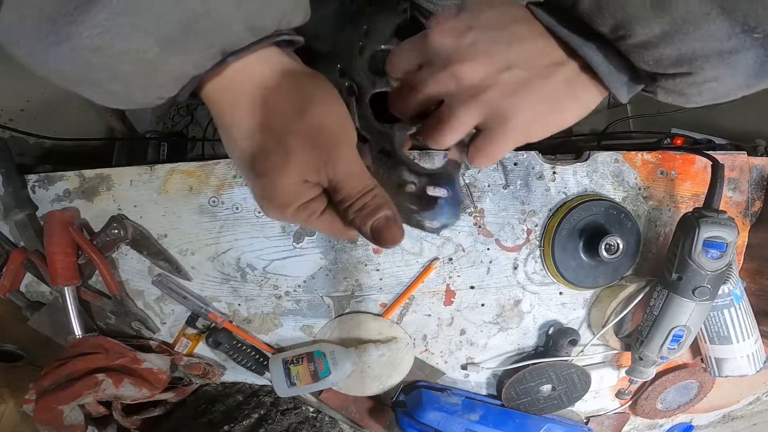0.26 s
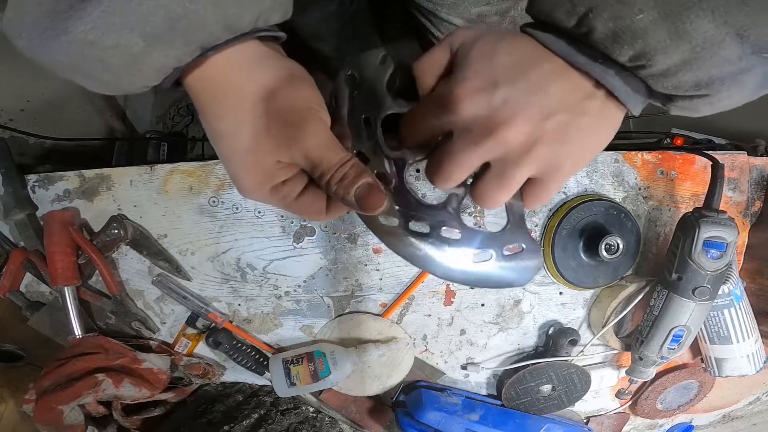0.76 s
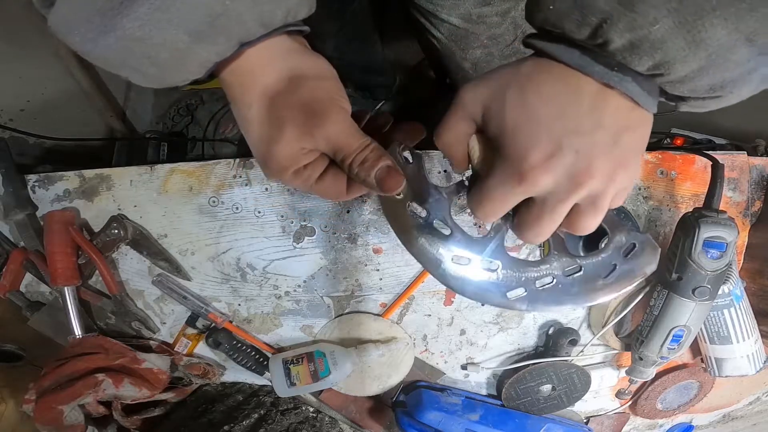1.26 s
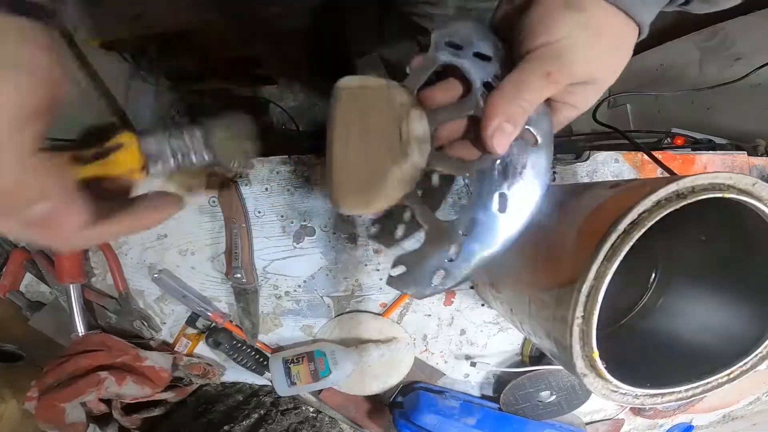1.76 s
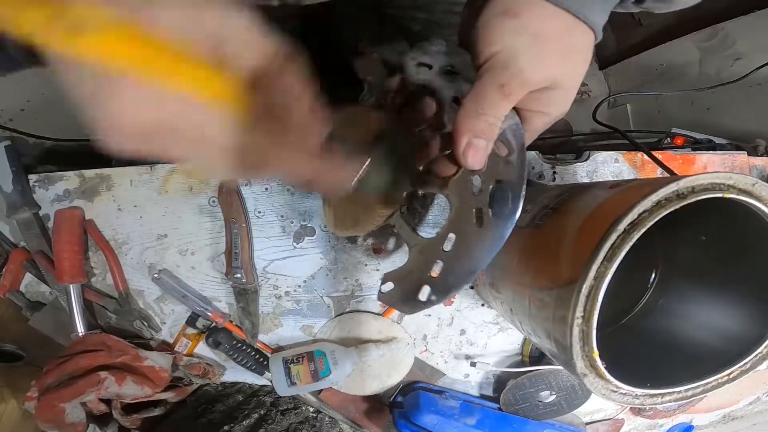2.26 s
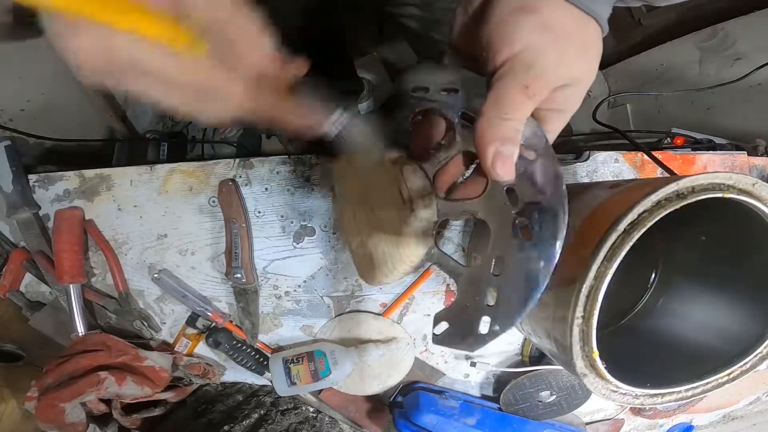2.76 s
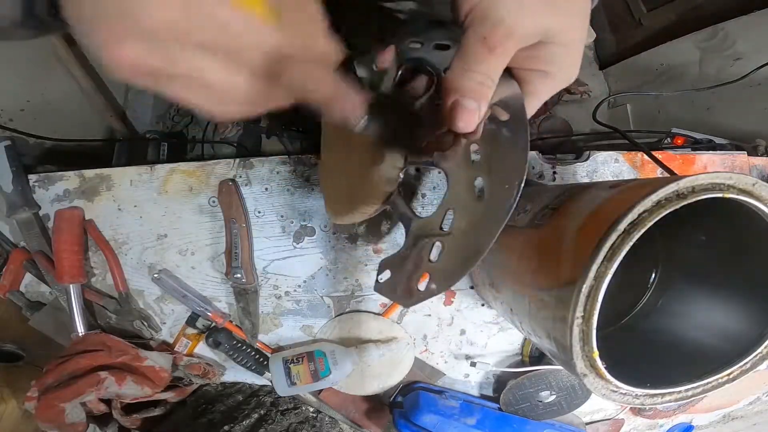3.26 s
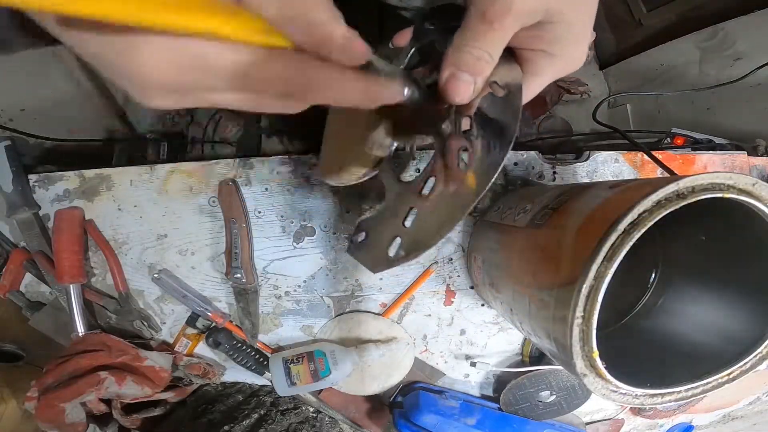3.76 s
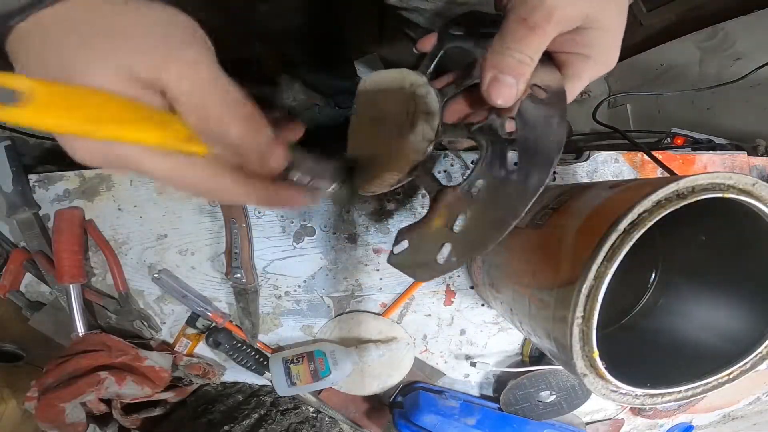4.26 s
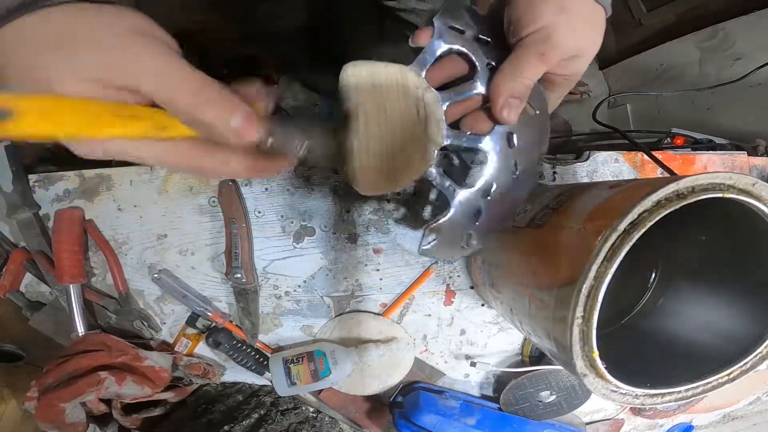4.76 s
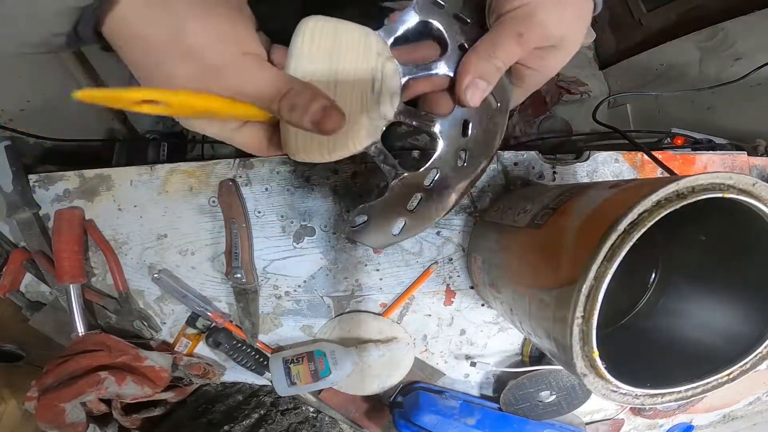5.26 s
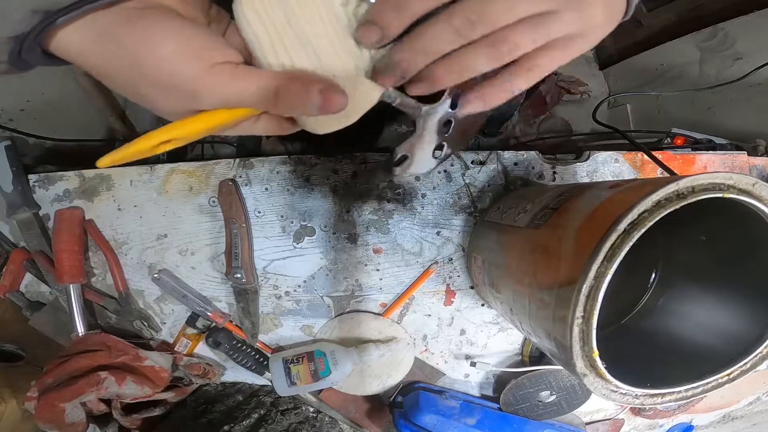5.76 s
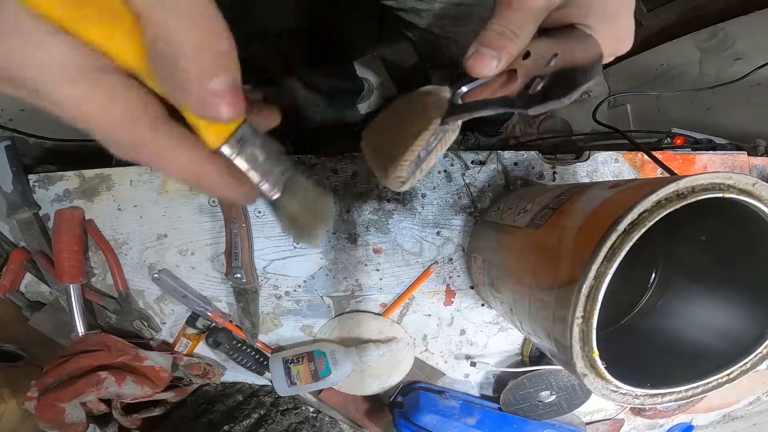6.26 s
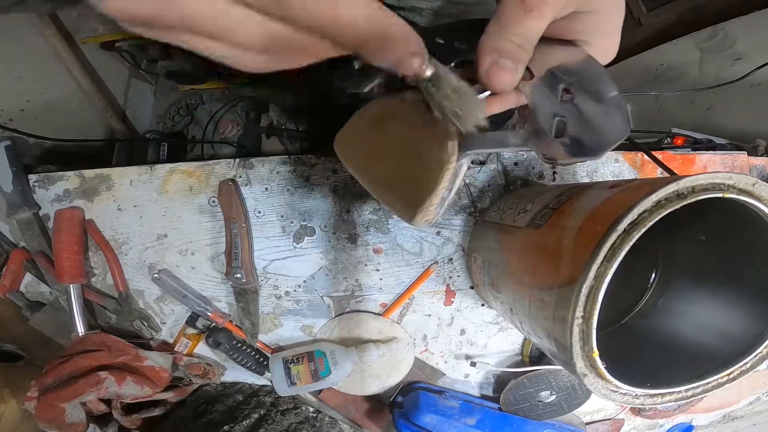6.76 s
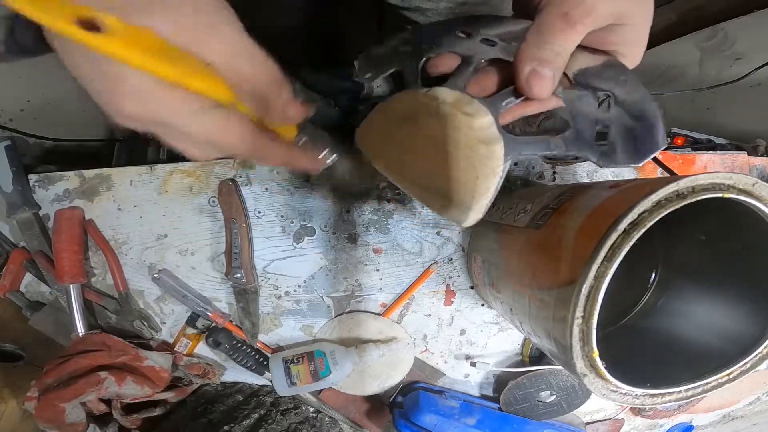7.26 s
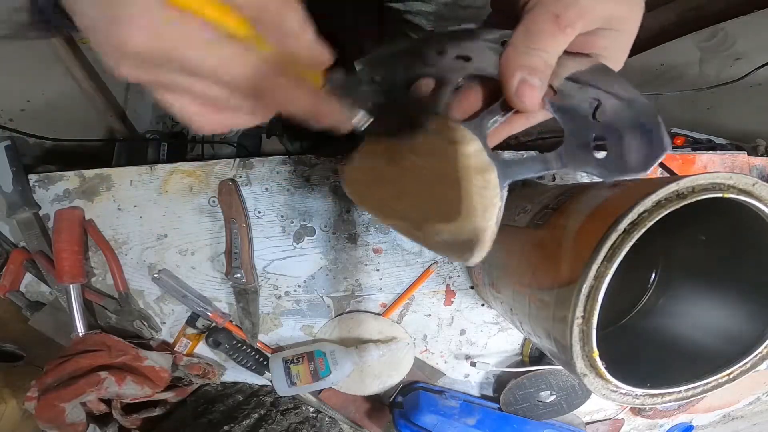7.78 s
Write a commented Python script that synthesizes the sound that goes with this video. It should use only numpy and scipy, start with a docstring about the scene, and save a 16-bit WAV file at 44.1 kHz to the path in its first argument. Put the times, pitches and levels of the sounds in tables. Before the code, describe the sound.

Fast, scratchy bristle strokes on thin pierced steel, about ten a second, give a bright, slightly ringing hiss with scattered ticks. They follow a near-silent opening of deep rumble and air, stop in the middle while the plate is turned with faint rubs and a low hum, then start again. Heard close up at a workbench, in stereo, with low room noise behind.

```python
"""A bristle brush flicks back and forth over a pierced steel plate held in the hand: random slips ring its modes.
Ferrule touches add ticks, filtered by the same plate, and dull thuds; narrow noise makes a few short squeaks.
Behind it a workshop rumbles in five low room modes and a draught moans and rushes, all as filtered noise.
The noise floor has a hollow band near 1.2 kHz that swells with the strokes."""
import sys
import numpy as np
from scipy import signal
from scipy.fft import rfft, irfft, next_fast_len
from scipy.io import wavfile
from scipy.ndimage import uniform_filter1d

SR = 44100
rng = np.random.default_rng(int(sys.argv[2]) if len(sys.argv) > 2 else 0)


def bounce(signal):
    """Save signal as a 16-bit WAV file at the path given by the first command-line argument."""
    frames = np.transpose(np.atleast_2d(signal))
    limited = np.clip(frames, -1, 1)
    pcm = np.round(limited * 32767).astype(np.int16)
    wavfile.write(sys.argv[1], SR, pcm)


N = 353858

# brush or finger strokes: (time of top [s], drive [dB], rise [ms], fall [ms], brightness [dB], hollowness [dB])
STROKES = [(0.15, -89, 35, 35, 1, 3), (0.42, -91, 45, 50, 6.5, 7.5), (1.085, -86.5, 83, 66, 8.5, 6),
           (1.645, -71, 21, 46, -8, 15.5), (1.768, -70.5, 31, 34, -0.5, 14), (2.026, -82, 45, 36, 0, -3),
           (2.118, -68.5, 4, 36, 1.5, 6), (2.227, -65.5, 29, 22, 1.5, 0), (2.337, -62.5, 45, 21, 1, 6),
           (2.424, -63.5, 32, 26, 0, 3), (2.525, -61, 38, 37.6, 1.5, -2), (2.615, -65.5, 12, 52, 1.5, 1),
           (2.726, -66.5, 23, 42, 3.5, 0), (2.851, -65, 24, 20, 0, 1), (2.913, -73.5, 28, 29, 2.5, -7),
           (2.968, -75.5, 10, 24, -8, 21.5), (3.037, -60.5, 16, 33, -1, 5.5), (3.083, -74.5, 91, 46, 1, 2),
           (3.204, -60.5, 19.6, 47.6, -0.5, 1), (3.425, -62.5, 15, 33.3, 2.5, 2.5),
           (3.39, -71, 28, 64, 0.5, 4), (3.51, -68, 19, 43, 6.5, -1), (3.55, -68.5, 30, 6, 1.5, -5),
           (3.635, -59.5, 40, 12.7, 1, -2), (3.722, -63, 47.8, 17, 3, 2), (3.806, -58.5, 31, 18.5, 1, 2),
           (3.862, -62.5, 7.7, 16, 3, -17), (3.897, -60.5, 35, 24, 1, 3.5), (3.966, -60, 3.6, 8.3, 0.5, -3),
           (3.99, -60, 32, 15, 3, 1), (4.069, -67, 36, 41, 5.5, -2), (4.163, -59.5, 22, 36, 3, 1),
           (4.239, -64, 8, 19, 2, 6), (4.284, -66.5, 72, 25, 1, 3), (4.346, -60, 17.4, 36, 4.5, -1),
           (4.434, -64, 15.3, 24, 4.5, -4), (4.492, -64, 17, 58, 0.5, 2), (4.703, -71.5, 20, 74, 6, -1),
           (4.927, -65, 37, 17, 6, 5), (5.089, -65.5, 27.5, 18.5, 5, 4), (5.23, -83.5, 420, 89, -0.5, 5.5),
           (5.334, -78, 15, 76, 6, -9), (5.55, -79.5, 73, 100, -10, 6.5), (5.7, -82.5, 72, 58, 1.5, 0),
           (5.833, -77.5, 16, 25, -9, 3), (5.905, -74.5, 10.5, 126, -6, 3), (5.992, -65, 32, 8.5, -8, 3.5),
           (6.38, -69.5, 63, 16, 3.5, -3), (6.486, -72.5, 25, 27, 2.5, 9), (6.59, -71.5, 65, 57.2, 4, 2),
           (6.78, -58.5, 30.4, 27.4, -2, 6.5), (6.859, -72.5, 20, 50, 5, 1), (6.974, -61, 34, 32, 1.5, 0),
           (7.085, -75.5, 19, 40, 8, -5), (7.171, -61.5, 23, 24.7, 7, -6), (7.268, -61.5, 12, 29, 3.5, -4),
           (7.365, -62, 23, 22.6, 4, 0.5), (7.439, -62, 9.3, 57, 3, 0), (7.516, -67.5, 6.7, 36, 1, 5.5),
           (7.634, -70.5, 22, 34, 6, -1), (7.733, -63, 35, 25, 2.5, 4.5), (7.81, -63.5, 22, 27.5, 2, -4),
           (7.938, -63, 29.5, 32, -3, 7), (7.995, -73, 31.6, 66, 4, -5)]
CONTROL_STEP = 32  # samples between control points


def brush(slips_per_s=9500, spread_db=2.5, flutter_db=1.0, catch_db=2.5):
    """Thousands of bristle slips a second, bunching as tufts catch on the edges of the holes."""
    ring_spread_db = 0.5  # strokes land on different parts of the plate and ring 4.4 kHz more or less
    ms = np.arange(0, N, CONTROL_STEP) * 1000 / SR
    power, colour_db = 1e-14, 0
    rings_db = ring_spread_db * rng.standard_normal(len(STROKES))
    for (s, db, rise_ms, fall_ms, *colour), ring_db in zip(STROKES, rings_db):
        stroke = swell(ms, s, db, rise_ms, fall_ms)
        power = power + stroke
        colour_db = colour_db + np.outer([*colour, ring_db], stroke)
    flutter = evened(uniform_filter1d(rng.standard_normal(len(ms)), size=7))
    # a tuft lets go at once and settles in a few ms, about forty times a second
    catches = signal.lfilter([1], [1, -.85], rng.random(len(ms)) < .03)
    level = np.sqrt(power) * amp(flutter_db * flutter + catch_db * catches)
    controls = (level, *amp(colour_db / power))  # overlapping strokes mix their colours by power
    level, *colour = (np.interp(np.arange(N) * 1000 / SR, ms, c) for c in controls)
    timing, sign, size = rng.random((N, 2, 3)).T
    slips = (timing < slips_per_s / SR) * np.sign(sign - .5) * amp(-spread_db * np.log(size + 0.0077))
    return patches(bands(level * evened(slips), *colour), 2.7)


def swell(ms, top_s, db, rise_ms, fall_ms):
    """Power of one stroke around its top, 6.55 dB down at the rise and fall times."""
    shape = 1.65  # 1 = pointed top, higher = flat top with steep flanks
    from_top_ms = ms - 1000 * top_s
    flank_ms = np.where(from_top_ms < 0, rise_ms, fall_ms)
    return amp(db - 6.55 * np.abs(from_top_ms / flank_ms) ** shape) ** 2


def bands(x, bright, hollow, ring):
    """Weights the treble, the low part and the part around 4.4 kHz of an excitation against the rest."""
    low = signal.sosfilt(signal.butter(3, 1450, fs=SR, output="sos"), x)
    high = signal.sosfilt(signal.butter(2, 4200, "high", fs=SR, output="sos"), x)
    upper = signal.sosfilt(signal.butter(1, (3600, 5200), "band", fs=SR, output="sos"), x)
    return x + (hollow - 1) * low + (bright - 1) * high + (ring - 1) * upper


def patches(x, depth_db):
    """The bristles wander over the plate, so that its modes swell and fade apart from one another."""
    z = signal.stft(x, nperseg=256, noverlap=192)[2]
    field = rng.standard_normal(z.shape[1:])  # frequency by time, common to both channels
    field = uniform_filter1d(field, size=3, axis=0)
    field = evened(uniform_filter1d(field, size=14, axis=1))
    return signal.istft(z * amp(depth_db * field), nperseg=256, noverlap=192)[1][:, :N]


def ticks():
    """Blows of ferrule and hand: noise bursts to ring the plate, and a dull thud of the hand behind it."""
    # (time [s], blow drive [dB], brightness [dB], hollowness [dB], thud drive [dB])
    touches = [(1.6189, -58, 0, 14, -58), (1.7695, -52, 0, -4, -84), (2.017, -53, -12, -17, -89),
               (2.1151, -57, -2, -5, -85), (2.3381, -43.5, 3, -9, -79), (2.6082, -63, -2, 4, -84),
               (2.9597, -53.5, -8, 5, -81), (3.026, -45.5, 2, 5, -78), (3.7179, -42, -7, -15, -63),
               (3.8965, -39, -10, -12, -81), (3.9613, -52, -4, -4, -83), (4.329, -46, -14, -5, -82),
               (4.507, -53, 3.5, 5, -83), (4.915, -49, -4, -3, -84), (5.3819, -46, 5, -2, -86),
               (6.769, -52, -10, 3, -70), (7.2662, -52, -4, -6, -82), (7.4306, -44.5, -4, -2, -80),
               (7.7302, -45, 3, 0, -84), (7.916, -39, 2, -2, -72)]
    decay_ms, thud_ms = 1.67, .45
    blows, thuds = np.zeros((2, N)), np.zeros(N)
    ms = np.arange(600) * 1000 / SR
    noises = rng.standard_normal((len(touches), 2, 600))
    for (s, db, *colour, thud_db), noise in zip(touches, noises):
        burst = .45 * noise * np.exp(-ms / decay_ms)
        burst = uniform_filter1d(burst, size=4)  # the contact is slightly soft, which dulls the top
        at = round(s * SR)
        blows[:, at:at + 600] += amp(db) * bands(burst, *amp(colour), 1)
        thuds[at:at + 600] += amp(thud_db) * 2.5 * (1 - ms / thud_ms) * np.exp(-ms / thud_ms)
    return blows, thuds


def plate(hz):
    """Plate modes on top of the plain hiss, with the phase that lets them ring only after a blow."""
    # modes of the plate: (centre [Hz], width [Hz], left [dB], right [dB])
    plate_modes = [(1166, 220, -14.5, -15.5), (1881, 67, -5, 0), (2016, 99, -5, -3.5), (2203, 230, -3, -2),
                   (2437, 150, -1.5, -0.5), (2730, 270, 2.5, -4.5), (3100, 140, -2, -18.5),
                   (3296, 120, -3, -4.5), (3680, 270, -4.5, -13), (3990, 300, -5.5, -9),
                   (4147, 120, 1.5, -7), (4645, 330, -14.5, 0.5), (5020, 200, -7.5, -5.5),
                   (5540, 320, -22, -6.5), (5960, 210, -8, -3.5), (6390, 380, -12.5, -2.5),
                   (7534, 350, -17.5, -6.5), (10300, 150, -50, -29)]
    # plain hiss of the bristles between the modes: (frequency [Hz], left [dB], right [dB])
    hiss = [(478, -26, -22), (1740, -13, -20), (2555, -10.5, -5), (3160, -17, -13.5), (5000, -13, -8),
            (6750, -25.5, -6), (8000, -17, -15.5), (7950, -18, -24), (8570, -24.5, -23.5),
            (10030, -36, -30), (10800, -28.5, -26.5), (11400, -36, -36.5)]
    power = amp(over_hz(hiss, hz)) ** 2
    for centre_hz, width_hz, left_db, right_db in plate_modes:
        power = power + amp([[left_db], [right_db]]) ** 2 * np.abs(mode(hz, centre_hz, width_hz)) ** 4
    log_gain = np.log(power) / 2
    # minimum phase of the mean of both sides
    circle = np.concatenate([log_gain, log_gain[:, -2:0:-1]], axis=1)
    phase = -signal.hilbert(circle.mean(axis=0)).imag[:len(hz)]
    return np.exp(log_gain + 1j * phase)


def ports(shared, other, colour):
    """Two microphone ports hear the shared sound; the right adds an unrelated share and is phase-shifted."""
    # (frequency [Hz], likeness [0-1], phase by which left lags [rad])
    port_curve = [(60.6, 1, 0), (144, .9, 1.67), (252, .6, 1.36), (600, 0.6, 1.48), (1310, 1, 1.02),
                  (1730, 0.2, 0.02), (2440, .92, 1.51), (3330, 0.9, 1.37), (4300, 0.97, 2), (5170, 0.1, 2),
                  (5490, 0.9, 1.5), (7250, 0.1, 4), (8260, 1, 4.5), (7500, 0.4, -4), (9850, 0.5, 1),
                  (10200, 1, 2.5)]
    size = 2 * next_fast_len(N // 2 + 4096)
    hz = np.fft.rfftfreq(size, 1 / SR)
    like, lag_rad = over_hz(port_curve, hz)
    left, unrelated = rfft(shared, size), rfft(other, size)
    right = (like * left + np.sqrt(1 - like ** 2) * unrelated) * np.exp(1j * lag_rad)
    return irfft(np.array([left, right]) * colour(hz), size)[:, :N]


def squeaks():
    """Short squeaks and hums of the handled plate: fuzzy tones that start quickly and fade."""
    # (start [s], level [dB], first pitch [Hz], last pitch [Hz], length [ms])
    tones = [(0.87, -82, 2450, 2650, 57), (1.508, -87.5, 3120, 3080, 39), (1.896, -82, 3230, 3274, 44),
             (5.69, -90, 4090, 4075, 45), (6.451, -77, 369, 370, 140), (6.73, -74.5, 372, 370, 92)]
    out = np.zeros(N)
    for s, db, first_hz, last_hz, ms in tones:
        u = np.arange(0, 1, 1000 / (ms * SR))
        tone = whistle(first_hz + (last_hz - first_hz) * u, first_hz / 10, 0).real
        out[round(s * SR):][:len(u)] += amp(db) * tone * np.sin(np.pi * u ** .6)
    return out


def whistle(hz, width_hz, steadiness):
    """Noise in a narrow band that follows the pitch curve, as a rotating pointer of partly steadied length."""
    r = np.exp(-np.pi * width_hz / SR)
    noise = rng.standard_normal((len(hz), 2)) @ [1, 1j]
    slow = evened(signal.lfilter([1], np.convolve([1, -r], [1, -r]), noise))
    slow = evened(slow / (np.abs(slow) + 0.047) ** steadiness)
    return slow * np.exp(2j * np.pi * np.cumsum(hz) / SR) * np.sqrt(2)


def rumble():
    """Five low room modes excited by noise, nearly the same at both ports."""
    # level of each mode, low to top: (time [s], level [dB])
    curve_46 = [(0, -64), (.12, -47.5), (.4, -64.5), (.56, -45), (.85, -39.5), (1.2, -41.5), (1.46, -45),
                (1.53, -63), (1.67, -63), (1.75, -46.5), (1.83, -63.5), (2.05, -53), (2.42, -62),
                (2.54, -47), (2.77, -56.5), (2.86, -50.5), (3.06, -56), (3.55, -51), (3.75, -60),
                (4.03, -48), (4.12, -56.5), (4.31, -45.5), (4.95, -46.5), (5.17, -58.5), (5.24, -46),
                (5.38, -68.5), (5.7, -47.5), (5.77, -67.5), (5.97, -52), (6.09, -41), (6.28, -48.5),
                (6.45, -56), (6.63, -48), (6.76, -56), (6.88, -46.5), (7.05, -56), (7.35, -47.5),
                (7.75, -44), (8.02, -47.5)]
    curve_61 = [(0.0, -60), (0.36, -65.5), (0.45, -52), (0.8, -68), (1.03, -56), (1.41, -52.5), (1.76, -75),
                (2.81, -58.5), (3.12, -71), (5.27, -64), (5.43, -71.5), (6.25, -57), (6.36, -66),
                (6.72, -59), (7.08, -73), (7.19, -54), (7.48, -60), (8.02, -57)]
    curve_73 = [(0.0, -61), (0.18, -59), (0.29, -68), (0.47, -50.5), (0.51, -62), (0.67, -54),
                (1.32, -67.5), (1.36, -57), (1.45, -71.5), (1.76, -63.5), (3.46, -71), (3.51, -58.5),
                (4.33, -81), (4.42, -58.5), (4.91, -61), (5.05, -41.5), (5.2, -44.5), (5.45, -62),
                (6.5, -73.5), (6.66, -59), (7.21, -70.5), (8.02, -66)]
    curve_128 = [(0.0, -84.5), (0.18, -59.5), (0.91, -77), (0.96, -61.5), (1.61, -78.5), (1.74, -56),
                 (2.1, -80.5), (2.3, -63.5), (3.21, -79.5), (3.26, -69), (3.42, -85), (3.51, -54),
                 (3.71, -72.5), (4.11, -72), (4.15, -83), (4.24, -64), (4.33, -78), (4.76, -55.5),
                 (5.76, -76.5), (5.81, -89), (5.92, -67), (6.03, -79), (6.12, -59), (6.23, -78),
                 (6.52, -74), (6.66, -56), (7.04, -71), (7.73, -67.5), (7.8, -71.5), (8.02, -63.5)]
    curve_165 = [(0.0, -62), (0.04, -83), (3.06, -84.5), (4.85, -77), (5.05, -64.5), (5.2, -82),
                 (5.94, -83), (7.17, -71), (7.33, -85), (8.02, -75)]
    low = boom(curve_46, 46.51, 5, 0.8) * beat()
    low = low + boom(curve_61, 61, 6.2, 0.8) + boom(curve_73, 73, 3.5, 0.9)
    high = boom(curve_128, 128, 8, 0.57) + boom(curve_165, 165, 22, 0.17)
    return low * amp([[.3], [-.3]]) + high * amp([[-.2], [.2]])


def boom(curve, centre_hz, width_hz, steadiness):
    """Noise through one room mode; its own swells are partly evened out so that the curve sets the level."""
    hz = np.fft.fftfreq(N, 1 / SR)
    spectrum = np.fft.fft(rng.standard_normal(N)) * mode(hz, centre_hz, width_hz) ** 2
    z = evened(np.fft.ifft(spectrum * (hz > 0)))
    z = z / (np.abs(z) + 0.049) ** steadiness
    return over_time(curve) * evened(z.real)


def beat():
    """Gain of the lowest mode, which late on beats evenly down to silence between crests."""
    from_s, fade_s, crest_s, beats_per_s = 6.2, 0.16, 7.3, 8.77
    t = np.arange(N) / SR
    depth = np.clip((t - from_s) / fade_s, 0, 1)
    return 1 - depth * (1 - np.abs(np.cos(np.pi * beats_per_s * (t - crest_s))))


def draught():
    """Air moaning through a gap with an unsteady pitch, louder and phase-leading at right, and its dull rush."""
    # line about which the moan wanders: (time [s], pitch [Hz])
    moan_line = [(0.0, 171.8), (0.25, 207), (1.0, 189), (1.419, 222), (1.6, 268), (1.779, 215.3),
                 (1.95, 258), (2.3, 268.5), (2.7, 220), (2.95, 260), (3.2, 216.5), (3.85, 240.2),
                 (4.5, 250), (5.1, 216.2), (5.4, 238.4), (5.579, 296.8), (7.1, 300.4), (7.3, 227.2),
                 (7.749, 331.4), (8.03, 274)]
    # dull rush: (time [s], level [dB])
    rush_curve = [(0, -78), (.45, -79), (.7, -84.5), (1.5, -84.5), (1.62, -73.5), (1.72, -83.5), (3.3, -84),
                  (4.8, -83), (5, -81), (5.3, -88), (6.5, -82), (7.3, -84.5), (8.02, -82)]
    drive_at_240_hz_db, db_per_octave, breaks_db = -70, -7, 1  # thins as it rises
    wander, gusts_db = .05, 2.5  # wander as a share of the pitch
    s, hz = np.transpose(moan_line)
    hz = np.interp(np.arange(N) / SR, s, hz)
    hz = hz * (1 + wander * (chance(size=1500) + chance(size=4000)))
    drive_db = drive_at_240_hz_db + db_per_octave * np.log2(hz / 240) + breaks_db * chance(size=3000)
    z = amp(drive_db) * whistle(hz, 18, .5)
    moan = (z * amp([[-8], [-2.5]]) * np.exp(-1j * np.array([[1.7], [0]]))).real
    a, b = rng.standard_normal((N, 2)).T
    rush = evened(ports(a, b, lambda f: mode(f, 347, 250) ** 2 * amp([[-1.5], [1.5]])))
    return moan + over_time(rush_curve) * amp(gusts_db * chance(size=3500)) * rush


def room(drift_db=.6):
    """Broad noise floor with a slow drift, and the hollow band, noise through three resonances."""
    # floor of the room: (frequency [Hz], left [dB], right [dB])
    floor_curve = [(15.6, -14.5, -11.5), (26.2, 0.5, -1), (106, -17.5, -13.5), (153, -21, -27),
                   (206, -27, -22.5), (307, -30, -27), (407, -42.5, -37.5), (755, -46, -39.5),
                   (1490, -42, -42), (2530, -44, -43.5), (3180, -48, -55.5), (6700, -52, -46.5),
                   (7950, -54, -58), (8900, -82.5, -75.5)]
    floor_db = -61
    a, b, c, d, drift = rng.standard_normal((N, 5)).T
    drift = uniform_filter1d(uniform_filter1d(drift, size=3000), size=3000)
    drift = amp(drift_db * evened(drift))
    floor = evened(ports(a * drift, b * drift, lambda hz: amp(over_hz(floor_curve, hz))))

    def hollow_colour(hz):
        """Three resonances between 1 and 1.24 kHz, stronger at left."""
        response = mode(hz, 1203, 220) ** 2 + 0.42 * mode(hz, 1238, 66) + 0.48 * mode(hz, 1005, 32)
        return response * amp([[1], [-1]])

    hollow = evened(ports(c, d, hollow_colour))
    return amp(floor_db) * floor + hollow_level() * hollow


def hollow_level():
    """The hollow band has a slow level of its own and swells with each stroke's drive and hollowness."""
    # (time [s], level [dB])
    own_curve = [(0, -83.5), (.6, -84.5), (.75, -88.5), (1.5, -86.5), (1.7, -79), (3.1, -83.5),
                 (3.35, -82.5), (4.5, -79), (5.2, -82), (5.55, -78.5), (5.9, -90), (6.5, -84.5), (7.1, -88),
                 (7.4, -77), (8.02, -77.5)]
    flicker_db, stroke_db = 1.5, -16
    ms = np.arange(0, N, CONTROL_STEP) * 1000 / SR
    power = sum(swell(ms, s, db + hollow_db + stroke_db, rise_ms, fall_ms)
                for s, db, rise_ms, fall_ms, _, hollow_db in STROKES)
    power = np.interp(np.arange(N) * 1000 / SR, ms, power)
    return np.sqrt(power + over_time(own_curve) ** 2) * amp(flicker_db * chance(size=1200))


def amp(db):
    """Decibels to gain."""
    return 10 ** (np.asarray(db) / 20)


def evened(x):
    """Scales to an rms of one."""
    return x / np.sqrt(np.mean(np.abs(x) ** 2) + 1e-30)


def over_hz(table, hz):
    """Reads every column of a table along a logarithmic frequency axis."""
    f, *columns = np.transpose(table)
    return np.array([np.interp(np.log(hz + 1), np.log(f), c) for c in columns])


def over_time(curve):
    """Gain at every sample from rows of time and level."""
    s, db = np.transpose(curve)
    return amp(np.interp(np.arange(N) / SR, s, db))


def mode(hz, centre_hz, width_hz):
    """Response of one resonance, one at its centre."""
    return 1 / (1 + 2j * (hz - centre_hz) / width_hz)


def chance(size):
    """Slow random drift of rms one; size is its grain in samples."""
    return evened(uniform_filter1d(uniform_filter1d(rng.standard_normal(N), size=size), size=size))


def scene():
    """Bristles and ticks excite the same plate; squeaks, rumble, draught and floor join it."""
    response = plate(np.fft.rfftfreq(4096, 1 / SR))
    plate_rms = np.sqrt(np.mean(np.abs(response) ** 2))
    blows, thuds = ticks()
    steel = ports(*(brush() + blows), plate) / plate_rms
    return steel + thuds + squeaks() + rumble() + draught() + room()


def record(dry):
    """The band limit, and the faint white noise of the converter."""
    edge_hz, self_noise_db = 11950, -102
    lowpass = signal.firwin(511, edge_hz, window=("kaiser", 9), fs=SR)
    limited = signal.oaconvolve(dry, lowpass[None], "same")
    return limited + amp(self_noise_db) * rng.standard_normal((N, 2)).T


dry = scene()
out = record(dry)
bounce(out)
```